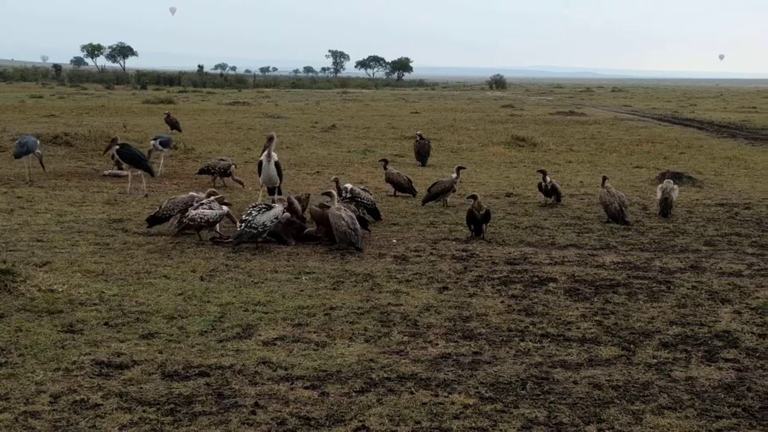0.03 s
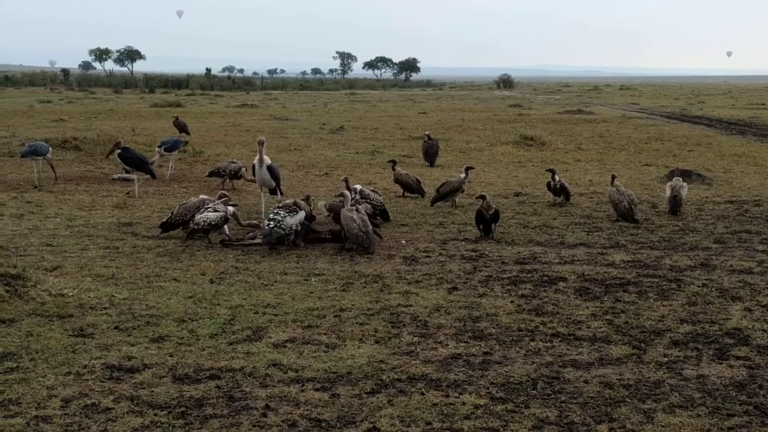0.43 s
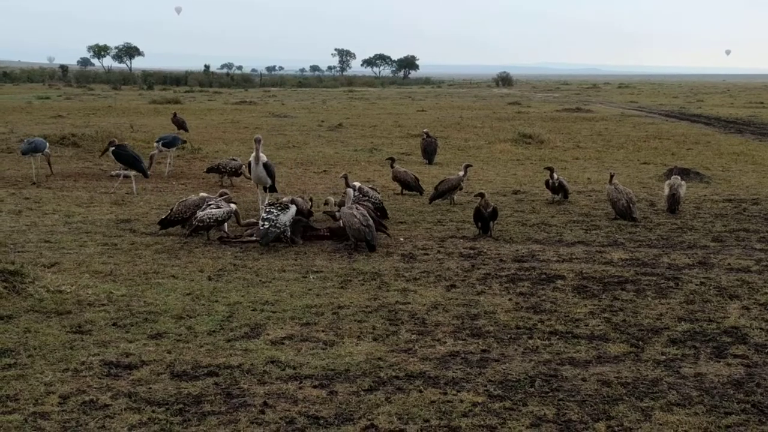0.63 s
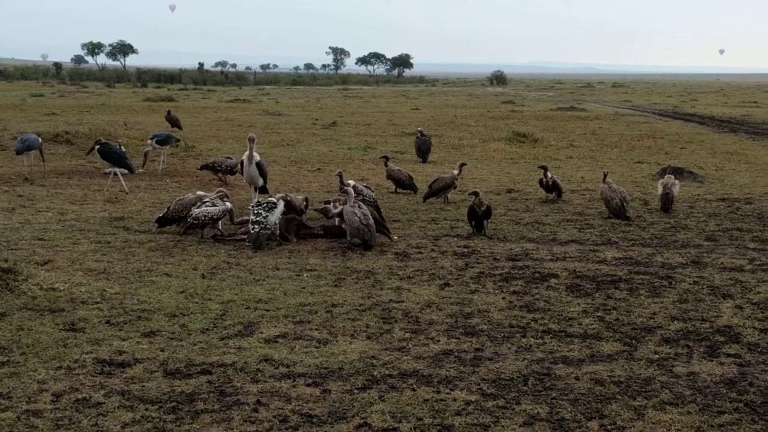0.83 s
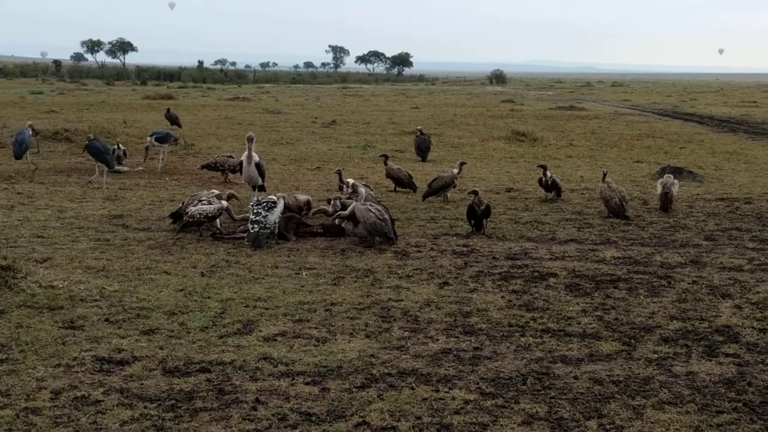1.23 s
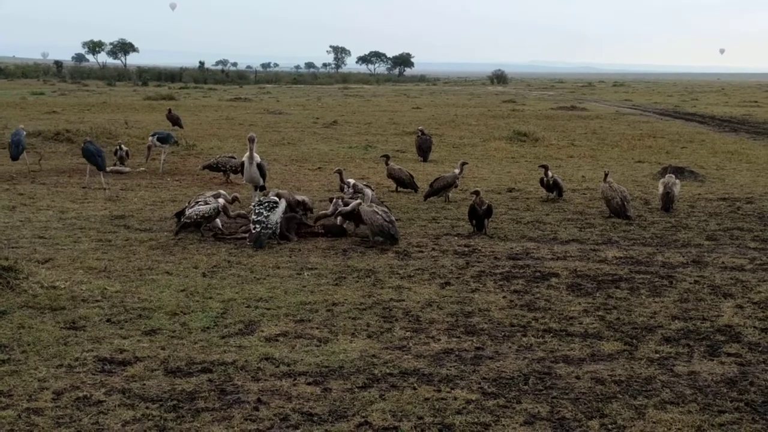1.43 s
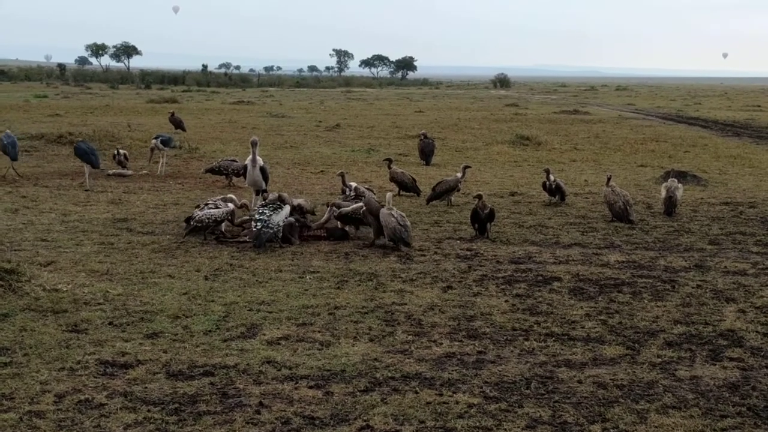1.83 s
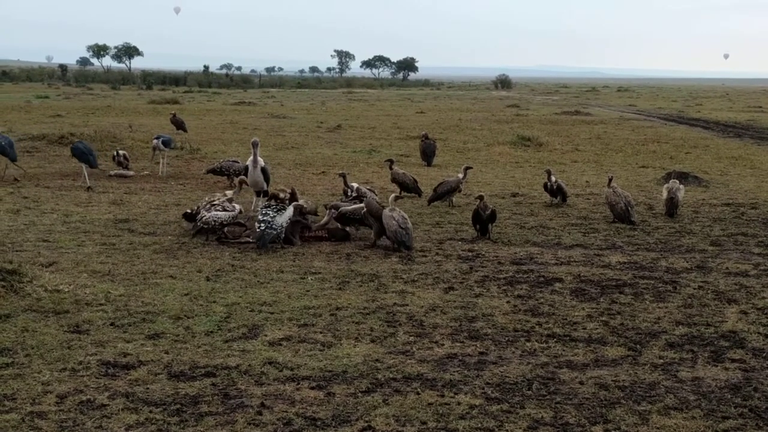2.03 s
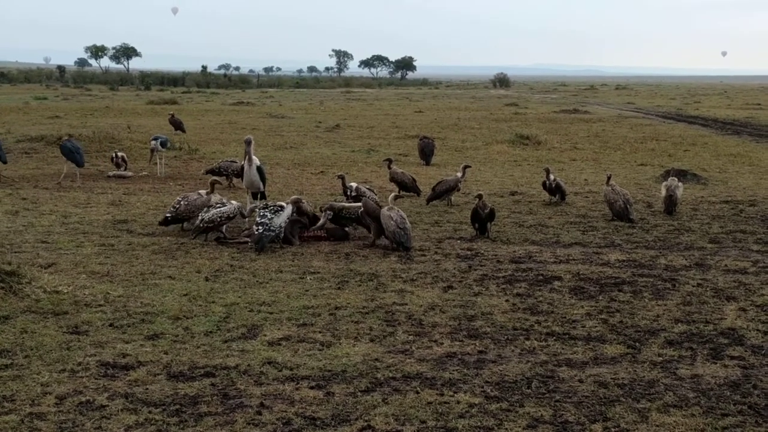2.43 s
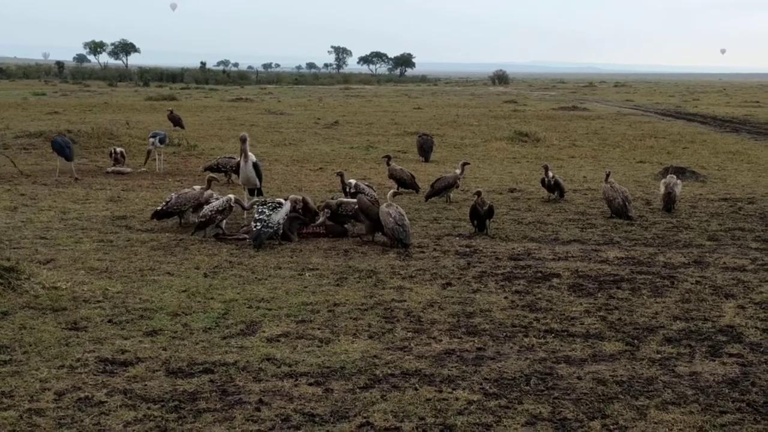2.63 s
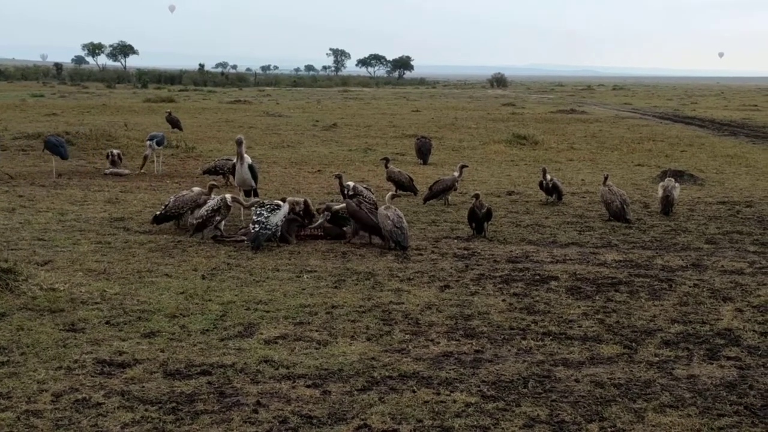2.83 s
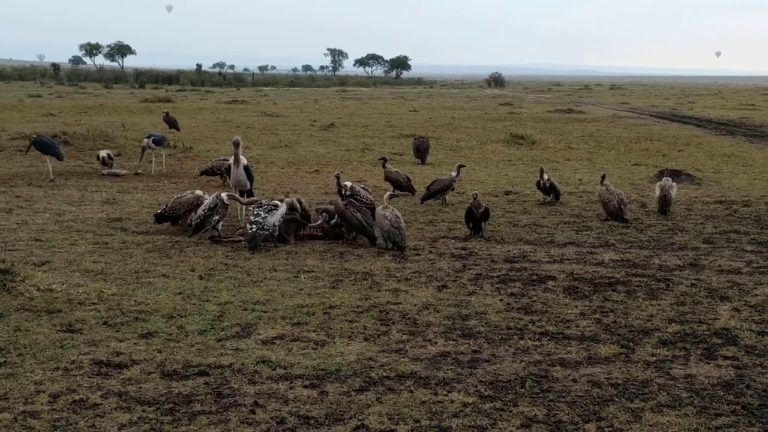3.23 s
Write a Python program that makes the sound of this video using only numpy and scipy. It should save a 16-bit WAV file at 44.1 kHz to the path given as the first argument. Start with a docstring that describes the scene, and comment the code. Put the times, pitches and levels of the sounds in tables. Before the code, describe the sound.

Vultures hiss at a carcass on an echoless plain. After a soft thump at 0.2 seconds, a harsh hiss darkens and surges again, then a faint, distant hiss follows until 1.4. A thump comes at 1.3, dry snaps at 1.6. Near 2 seconds another hiss breaks into a long fluttering rasp over a low growl, fading into thin squeals around 3. Faint air and a low drone continue underneath.

```python
"""Vultures squabble at a carcass on an open, echoless plain. After a soft thump, one forces air through its
throat in a harsh hiss that darkens as the throat closes, then surges again. A faint hiss follows further
back, with a thump and dry snaps. Near 2 s a second hiss breaks into a long rasp, a slack membrane
fluttering over a low growl, and runs out in a brief flare and thin squeals.
Faint air and a low distant drone lie under it all."""
import sys
import numpy as np
from scipy import signal
from scipy.fft import rfft, irfft
from scipy.io import wavfile

SR = 44100
rng = np.random.default_rng(int(sys.argv[2]) if len(sys.argv) > 2 else 0)


def store_pcm(level_fs):
    """Save levels as 16-bit WAV."""
    pcm = np.round(np.clip(level_fs, -1, 1) * 32767).astype(np.int16)
    wavfile.write(sys.argv[1], SR, np.atleast_2d(pcm).T)


N = 149940
T = np.arange(N) / SR
FRAMES = dict(nperseg=768, noverlap=576)
SPUTTER_DB = 1.0

# First hiss: t/s, level/dB, throat closure/0-1
SCREECH_CONTOUR = [(.239,-48,0.63),(.25,-42,0.2),(.268,-33,0.14),(.297,-33,.1),(.352,-34.5,0.25),(.385,-36.5,0.5),(.445,-38,0.77),(.49,-42,0.85),(.52,-46,0.94)]
# First throat, spectrum: f/Hz, gain/dB
FIRST_THROAT = [(100,-29),(900,-23),(1700,-15),(2300,-10),(3600,-14),(7000,-17.5),(11000,-21.5),(14000,-31)]
# Its modes: f open/Hz, f closed/Hz, width/Hz, level open/dB, level closed/dB
SCREECH_MODES = [(1330,850,300,-14.5,-19.5),(1630,1400,180,-15.5,-9.5),(2400,1880,510,-1.5,0.5),(2966,2540,300,3,-3.5),(3960,2900,340,-2.5,1),(4660,4150,1200,-7,-4),(5750,5900,870,-4,-13.5),(7440,7200,940,-8.5,-14.5),(9600,9100,1200,-15.5,-15)]

def screech(air_db=-6, wander=.016, wander_hz=45):
    """A sputtering jet rings throat modes, which waver and mostly sink as the throat closes."""
    db, closure = curve(SCREECH_CONTOUR)
    air = amp(air_db) * unit(colour(noise(), FIRST_THROAT))
    power = amp(air_db) ** 2
    for open_hz, closed_hz, width_hz, open_db, closed_db in SCREECH_MODES:
        hz = (open_hz + (closed_hz - open_hz) * closure) * (1 + wander * drift(wander_hz))
        gain = amp(open_db + (closed_db - open_db) * closure)
        air += gain * band(noise(), hz, width_hz)
        power += gain ** 2
    f, t, spectra = signal.stft(air / np.sqrt(power), SR, **FRAMES)
    age_s = np.clip(t - SCREECH_CONTOUR[0][0], 0, 1)
    rippled = from_spectra(spectra * amp(ripple_db(f[:, None], age_s)))
    return rippled * amp(db + SPUTTER_DB * drift(280)) * gate(SCREECH_CONTOUR)


def hiss(contour, throat, rings, sag_per_s, peak_db, half_width_hz):
    """Sputtering air through a throat: one moving peak, sliding ripples, rings sinking at sag_per_s."""
    jet = noise() * amp(SPUTTER_DB * drift(250))
    f, t, spectra = signal.stft(jet, SR, **FRAMES)
    f = f[:, None]
    _, peak_hz, treble_db = curve(contour, t)
    age_s = np.clip(t, contour[0][0], contour[-1][0]) - contour[1][0]
    throat_db = spectrum_db(throat, f) + rings_db(rings, f * np.exp(sag_per_s * age_s))
    formant_db = rings_db([(peak_hz, half_width_hz, peak_db)], f)
    shelf_db = (treble_db + 9) / (1 + (4000 / (f + 1)) ** 6)  # flat at treble = -9 dB
    gain = amp(throat_db + formant_db + ripple_db(f, age_s) + shelf_db)
    air = from_spectra(spectra * gain / np.linalg.norm(gain, axis=0))
    return air * amp(curve(contour)[0]) * gate(contour)


def ripple_db(hz, age_s, depth_db=5.44, sag_per_s=1.0):
    """Fine random peaks and notches of the throat slide down as the call ages."""
    ripples = rng.uniform(-depth_db, depth_db, 400)
    return np.interp(hz * np.exp(sag_per_s * age_s), np.linspace(0, SR, 400), ripples)


# Surge of the first hiss: t/s, level/dB, peak f/Hz, treble/dB
SURGE_CONTOUR = [(.508,-49.5,2500,5),(.525,-40,2580,-4.5),(.558,-39,2840,-13),(.59,-40,2400,-15),(.61,-43,2240,-12.5),(.662,-40.5,2430,-12.5),(.70,-47,2000,-21),(.716,-57,1880,-8)]
# Its resonances: f/Hz, half width/Hz, gain/dB
SURGE_RINGS = [(2090,100,8),(2910,120,6.5),(4750,200,3),(5700,410,8)]

def surge():
    """A second push of air through the first throat; its resonances sink fast."""
    return hiss(SURGE_CONTOUR, FIRST_THROAT, SURGE_RINGS, sag_per_s=.65, peak_db=10.5, half_width_hz=740)


# Second hiss: t/s, level/dB, peak f/Hz, treble/dB
SECOND_CONTOUR = [(1.835,-72.5,3300,-14),(1.93,-70,2600,-1),(1.97,-53.5,1460,-9),(2.01,-48,1930,-19),(2.022,-38.5,2000,-11),(2.04,-33,2310,-9),(2.075,-34,1960,-10),(2.11,-39.5,1550,-15.5),(2.155,-42,1410,-13),(2.18,-33.5,1300,-9),(2.2,-33,1600,-4),(2.212,-54,1800,-24)]
# Second throat, spectrum: f/Hz, gain/dB
SECOND_THROAT = [(100,-24),(400,-10),(900,-15.5),(1500,-5.5),(2000,-1.5),(2800,-2.5),(3150,-3.5),(3700,1),(4500,-5),(5300,-8.5),(9500,-16.5),(15000,-31)]
# Its resonances: f/Hz, half width/Hz, gain/dB
SECOND_RINGS = [(718,37,14),(1436,43,11.5),(4510,280,6)]

def second_hiss():
    """Air through the second throat, leading into the rasp; its resonances sink slowly."""
    return hiss(SECOND_CONTOUR, SECOND_THROAT, SECOND_RINGS,
                sag_per_s=.25, peak_db=8.5, half_width_hz=350)


# Membrane flutter: t/s, level/dB, rate/Hz, roughness/0-1
FLUTTER_CONTOUR = [(2.08,-43.5,200,0.65),(2.16,-41.5,260.2,0.67),(2.185,-40.5,375,0.54),(2.199,-32.5,327.8,0.46),(2.21,-38.5,165.8,0),(2.28,-39,166.3,0.08),(2.36,-42.5,200.6,0.63),(2.42,-40.5,228.7,0.57),(2.48,-39,172.4,0.23),(2.56,-41,173.8,0.39),(2.83,-41.5,167.5,0.18),(2.94,-45,166.7,.4),(3.02,-50.5,175.3,0.81),(3.148,-52.5,259.3,0.99),(3.162,-56,252.3,0.97),(3.22,-65,255.5,0.88),(3.3,-72,266,0.92)]
# Rasping throat, spectrum: f/Hz, gain/dB
FLUTTER_THROAT = [(100,-22.5),(166,-11),(270,-22.5),(400,-11),(570,-25.5),(900,-21),(1500,-11),(2100,-5.5),(2550,-5.5),(3200,-16.5),(3650,-7.5),(4400,-9.5),(5400,-20.5),(6600,-18),(8800,-29.5),(15500,-40.5)]
# Its resonances: f/Hz, half width/Hz, gain/dB
FLUTTER_RINGS = [(724,67,13.4),(1110,29,8.4),(1687,20,7.4),(2040,65,7.5),(2985,43,7.4),(9870,310,8.1)]

def rasp(jitter=.3, strays_per_s=310, puff_cycles=.78):
    """A slack membrane slaps unevenly; each slap and its puff of air ring the throat."""
    db, hz, roughness = curve(FLUTTER_CONTOUR)
    cycles = np.cumsum(hz * np.exp(jitter * roughness * drift(150))) / SR
    sizes = amp(-np.clip(noise(), -2, 1.5))
    slaps = np.diff(np.floor(cycles), prepend=0) * sizes / np.sqrt(hz)
    strays = (rng.random(N) < strays_per_s / SR) * sizes * np.sqrt(abs(roughness))
    puffs = noise() * (.52 + np.exp(-(cycles % 1) / puff_cycles))
    slap_gain, stray_gain, puff_gain = amp([-5.5, -3, -5])
    fade = amp(np.interp(T, [2.9, 3.12], [0, -8]))  # slaps give way to air
    drive = fade * (slap_gain * unit(slaps) + stray_gain * unit(strays)) + puff_gain * unit(puffs)
    drive /= np.sqrt(fade ** 2 * (slap_gain ** 2 + stray_gain ** 2) + puff_gain ** 2)
    return unit(colour(drive, FLUTTER_THROAT, FLUTTER_RINGS)) * amp(db) * gate(FLUTTER_CONTOUR)


# Hardest membrane slaps: t/s, drive level/dB
SLAP_HITS = [(2.176,-9),(2.186,0),(2.196,-1),(3.0558,-11.5)]

def hard_slaps():
    """Single slaps crack out of the rasp and ring the same throat."""
    impulses = np.zeros(N)
    for start_s, db in SLAP_HITS:
        add(impulses, start_s, amp([db]))
    return colour(impulses, FLUTTER_THROAT, FLUTTER_RINGS)


# Last flare of the rasp: t/s, level/dB, peak f/Hz, treble/dB
FLARE_CONTOUR = [(3.098,-56,2250,-14),(3.125,-50,2200,-9),(3.153,-46.5,2205,-8)]

def flare():
    """Air swells through the rasping throat and is cut short."""
    return hiss(FLARE_CONTOUR, FLUTTER_THROAT, [], sag_per_s=0, peak_db=10.5, half_width_hz=440)


# Flutter fundamental: t/s, level/dB
GROWL_CONTOUR = [(2.14,-68),(2.2,-56.5),(2.27,-55.5),(2.34,-67.5),(2.41,-65),(2.48,-55),(2.57,-63),(2.66,-53),(2.7,-70),(2.75,-57),(2.93,-57.5),(3.02,-77)]

def growl(hz=169.8, wobble=.017):
    """The flutter's low fundamental wavers under the rasp."""
    return sine(hz * (1 + wobble * drift(25.2))) * amp(curve(GROWL_CONTOUR)[0]) * gate(GROWL_CONTOUR)


# Throat whistles: t/s, length/s, level/dB, f/Hz, fall/0-1, harmonic 2/dB, 3/dB, 4 and 5/dB
SQUEAL_NOTES = [(0.699,0.026,-51.5,1812,0.02,-13,-30,-40),(1.931,0.034,-57,1450,0.01,-3,-11,-26),
                (2.961,0.16,-63,728.5,0.04,-1,4,-22),(3.104,0.057,-59.5,710,0.05,-3,7,-17),(3.144,0.125,-66,727,.025,-8,-24,-31),(3.143,0.12,-64,1078,0,-4.5,-17,-29),(3.251,0.056,-64.5,704,.11,-0.5,-2,-15)]

def squeals(edge_s=.0048, wobble_depth=.021, flicker_depth=.42):
    """The narrowed throat whistles; most notes sag as the air runs out."""
    out = np.zeros(N)
    wobble, flicker = 1 + wobble_depth * drift(350), 1 + flicker_depth * drift(140)
    for start_s, length_s, db, hz, fall, second_db, third_db, upper_db in SQUEAL_NOTES:
        t = np.arange(0, length_s, 1 / SR)
        pitch_hz = hz * (1 - fall * (t / length_s) ** 2) * np.interp(start_s + t, T, wobble)
        phase = 2 * np.pi * np.cumsum(pitch_hz) / SR
        gains = amp([0, second_db, third_db, upper_db, upper_db])
        tone = sum(gain * np.sin(k * phase) for k, gain in enumerate(gains, 1))
        envelope = np.clip(np.minimum(t, length_s - t) / edge_s, 0, 1)
        envelope *= np.interp(start_s + t, T, flicker)
        add(out, start_s, np.sqrt(2) * amp(db) * envelope * tone)
    return out


# Soft bumps: t/s, level/dB, f/Hz, t60/s
THUMP_HITS = [(.202,-43,154,0.091),(.203,-51,356,0.16),(0.449,-56.5,63.5,0.34),(0.562,-53,53.6,0.28),(1.335,-43.5,251,0.063)]

def thumps(rise_s=.00076):
    """Dull, heavily damped bumps with a slight scuff."""
    out, t = np.zeros(N), np.arange(SR // 4) / SR
    for start_s, db, hz, t60_s in THUMP_HITS:
        scuff = .3 * band(noise(len(t)), hz, width_hz=hz)
        envelope = amp(db - 60 * t / t60_s) * np.minimum(t / rise_s, 1)
        add(out, start_s, envelope * (np.sin(2 * np.pi * hz * t) + scuff))
    return out


# Dry snaps: t/s, level/dB, f/Hz, t60/s
SNAP_HITS = [(1.562,-49,3540,0.017),(1.5647,-40,3640,0.025),(1.57,-42.5,4250,0.017),(1.603,-49,2470,0.016)]
# Crack spectrum: f/Hz, gain/dB
CRACK_SPECTRUM = [(200,7),(2400,-11.5),(3200,-1),(7000,-2),(11000,0),(16000,-5)]

def snaps(crack_db=-3, ring_db=-3):
    """Short bright cracks, each with one broad resonance."""
    out, t = np.zeros(N), np.arange(SR // 8) / SR
    for start_s, db, hz, t60_s in SNAP_HITS:
        burst = noise(len(t))
        ring = amp(ring_db) * band(burst, hz, width_hz=1500)
        crack = amp(crack_db) * unit(colour(burst, CRACK_SPECTRUM))
        add(out, start_s, (crack + ring) * amp(db - 60 * t / t60_s))
    return out


# Distant hiss: t/s, level/dB, peak f/Hz, treble/dB
DISTANT_CONTOUR = [(.72,-63.5,2720,-12),(1.0,-65,2030,-16),(1.28,-68,1501,-15),(1.42,-74.5,1300,-19)]
# Distant throat, spectrum: f/Hz, gain/dB
DISTANT_THROAT = [(600,-25),(1300,-6.5),(2900,-3.5),(5000,-5.5),(10000,-36)]
# Its resonance: f/Hz, half width/Hz, gain/dB
DISTANT_RINGS = [(1280,43,8.5)]

def distant_hiss():
    """Faint air through a throat further back; its main peak falls."""
    return hiss(DISTANT_CONTOUR, DISTANT_THROAT, DISTANT_RINGS,
                sag_per_s=0, peak_db=5.5, half_width_hz=830)


# Open air, spectrum: f/Hz, gain/dB
AIR_SPECTRUM = [(29, -3), (50, 4.5), (416, -13), (837, -15), (1170, -17.5), (2190, -18), (4000, -21.5),
                (15800, -21.5)]

def open_air(level_db=-64, low_cut_hz=42):
    """Faint, even air over the plain."""
    f = np.fft.rfftfreq(N, 1 / SR)
    gain = amp(spectrum_db(AIR_SPECTRUM, f)) / (1 + (low_cut_hz / (f + 1)) ** 10)
    return amp(level_db) * unit(irfft(rfft(noise()) * gain, N))


# Distant drone: t/s, f/Hz, level/dB
DRONE_CONTOUR = [(0,69.5,-76),(.55,82,-69.5),(1.2,76,-72),(3.4,88,-75.5)]

def drone(wobble=.02):
    """A low wavering tone, like a far engine."""
    hz, db = curve(DRONE_CONTOUR)
    return sine(hz * (1 + wobble * drift(8.7))) * amp(db + drift(2))


def amp(db):
    """Decibels to gain."""
    return 10 ** (np.asarray(db) / 20)


def unit(x):
    """Scales to rms 1."""
    return x / np.sqrt(np.mean(x ** 2) + 1e-20)


def noise(samples=N):
    """White noise, rms 1."""
    return rng.standard_normal(samples)


def sine(hz):
    """Sine of moving pitch, rms 1."""
    return unit(np.sin(2 * np.pi * np.cumsum(hz) / SR))


def drift(rate_hz):
    """Smooth random motion, rms 1."""
    f = np.fft.rfftfreq(N, 1 / SR)
    return unit(irfft(rfft(noise()) * np.exp(-(f / rate_hz) ** 2), N))


def curve(rows, t=T):
    """Columns of a timed table at times t."""
    times_s, *columns = np.transpose(rows)
    return [np.interp(t, times_s, column) for column in columns]


def gate(rows, fade_s=.004):
    """1 while a timed table lasts, fading outside its ends."""
    return np.clip(np.minimum(T - rows[0][0], rows[-1][0] - T) / fade_s + 1, 0, 1)


def add(mix, start_s, sound):
    """Mixes a sound in at start_s."""
    part = mix[round(start_s * SR):][:len(sound)]
    part += sound[:len(part)]


def spectrum_db(points, hz):
    """Spectrum interpolated over log frequency."""
    f, db = np.transpose(points)
    return np.interp(np.log(hz + 1), np.log(f), db)


def rings_db(rings, hz):
    """Sum of resonant peaks."""
    return sum(db / (1 + ((hz - centre) / half_width) ** 2) for centre, half_width, db in rings)


def colour(x, points, rings=()):
    """Minimum-phase filter with the given spectrum and resonances."""
    hz = abs(np.fft.fftfreq(4096, 1 / SR))
    log_gain = np.log(amp(spectrum_db(points, hz) + rings_db(rings, hz)))
    taps = np.fft.ifft(np.exp(np.conj(signal.hilbert(log_gain)))).real[:2048]
    return signal.oaconvolve(x, taps)[:len(x)]


def band(x, hz, width_hz):
    """Two passes through a fixed or moving resonance, rms 1."""
    carrier = np.exp(2j * np.pi * np.cumsum(hz * np.ones(len(x))) / SR)
    pole = np.exp(-np.pi * width_hz / SR)
    for _ in range(2):
        x = (carrier * signal.lfilter([1 - pole], [1, -pole], x / carrier)).real
    return unit(x)


def from_spectra(spectra):
    """Short-time spectra to sound, rms 1."""
    return unit(signal.istft(spectra, **FRAMES)[1][:N])


def scene():
    """All sources, the same in both channels."""
    hisses = screech() + surge() + second_hiss() + flare() + distant_hiss()
    birds = hisses + rasp() + hard_slaps() + growl() + squeals()
    mono = birds + thumps() + snaps() + open_air() + drone()
    return np.array([mono, mono])


def record(dry):
    """Steep low-pass at 16050 Hz."""
    taps = signal.firwin(511, 16050, window=("kaiser", 9), fs=SR)
    return signal.oaconvolve(dry, taps[None], "same")


dry = scene()
out = record(dry)
store_pcm(out)
```